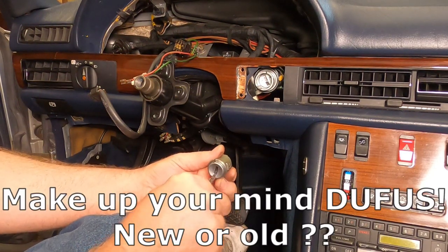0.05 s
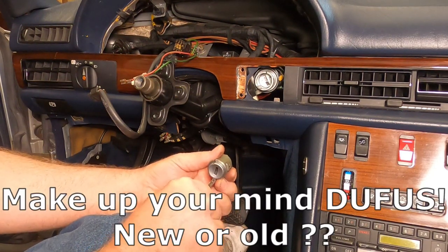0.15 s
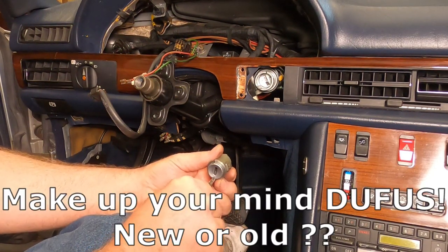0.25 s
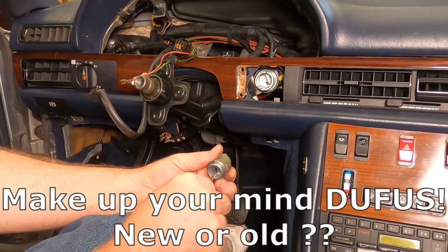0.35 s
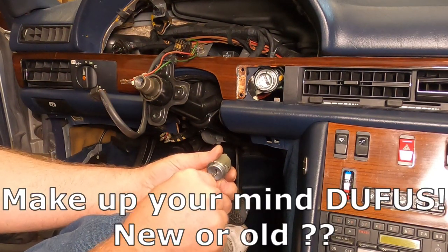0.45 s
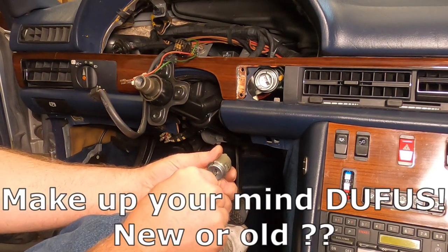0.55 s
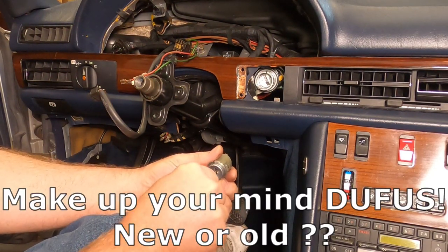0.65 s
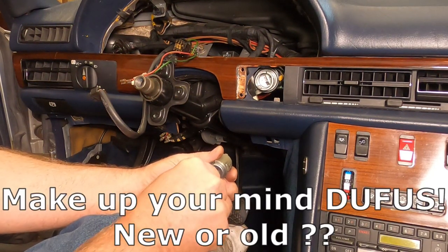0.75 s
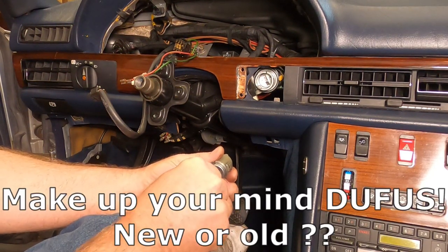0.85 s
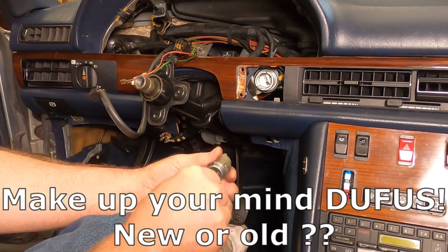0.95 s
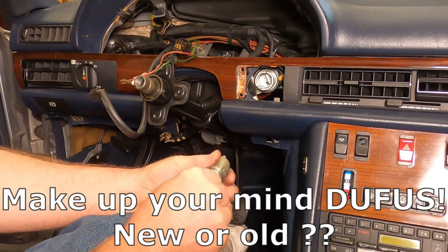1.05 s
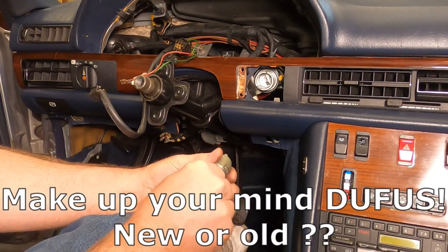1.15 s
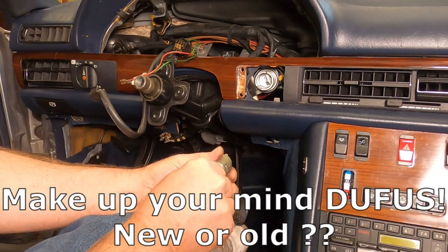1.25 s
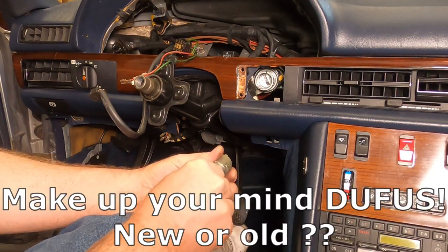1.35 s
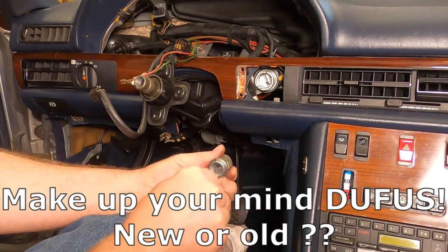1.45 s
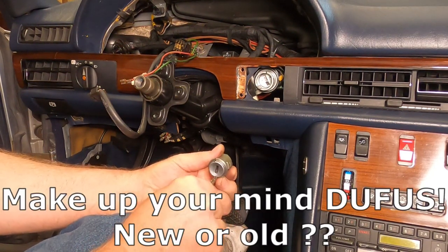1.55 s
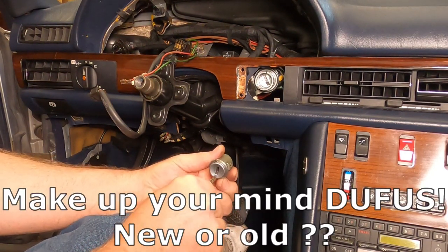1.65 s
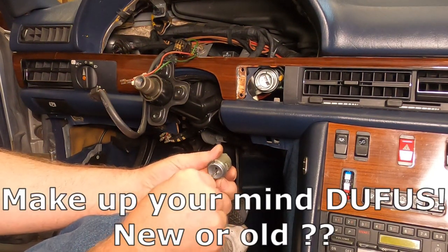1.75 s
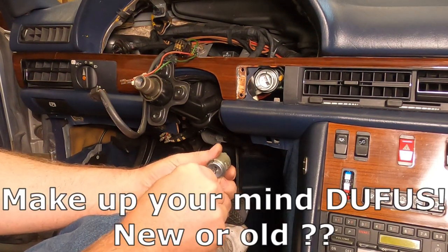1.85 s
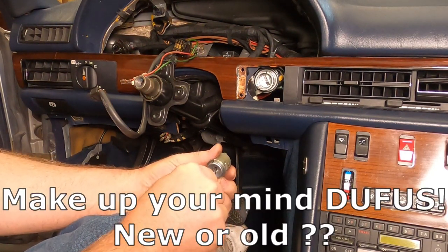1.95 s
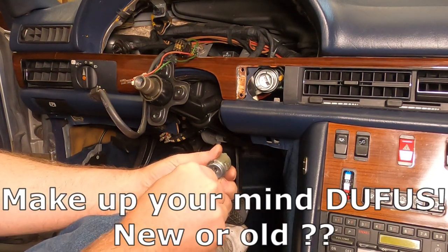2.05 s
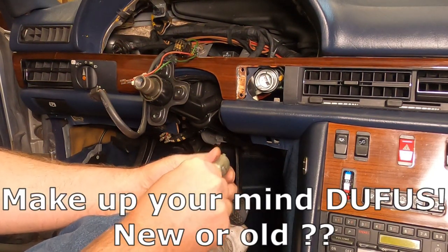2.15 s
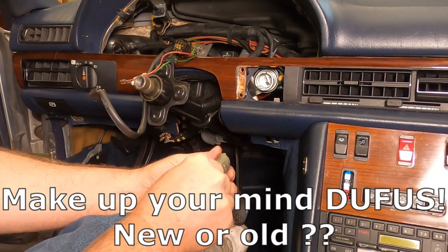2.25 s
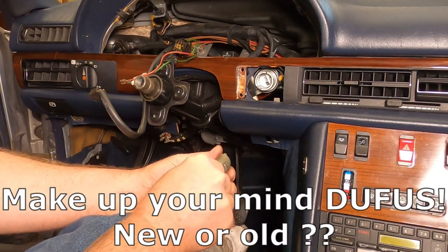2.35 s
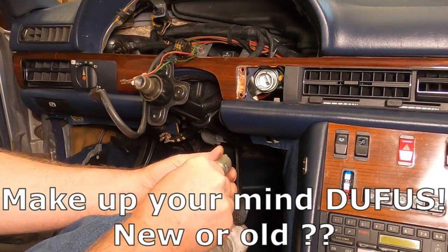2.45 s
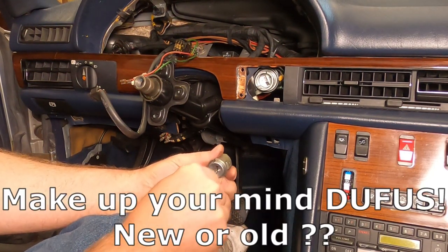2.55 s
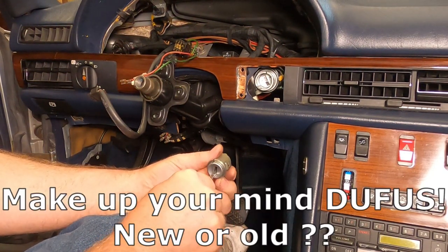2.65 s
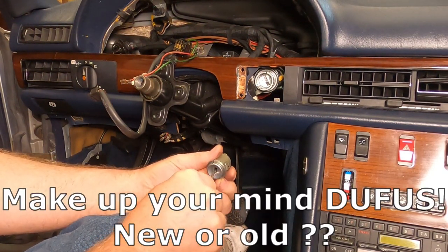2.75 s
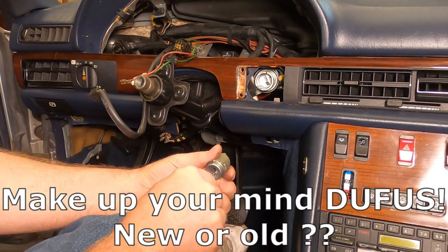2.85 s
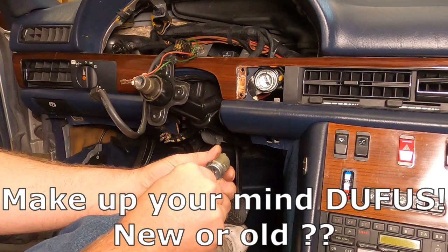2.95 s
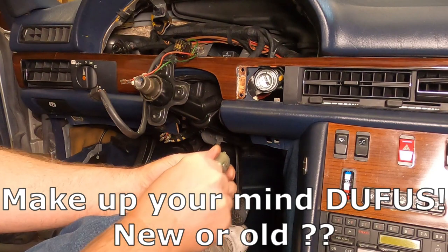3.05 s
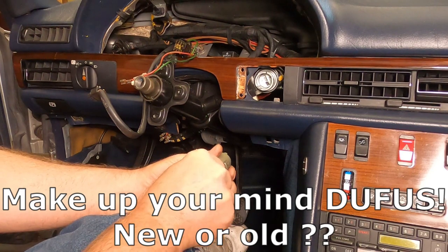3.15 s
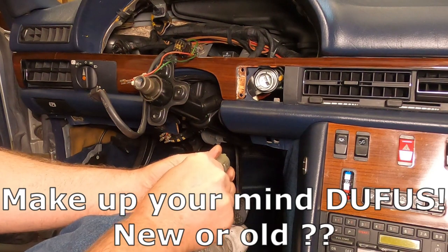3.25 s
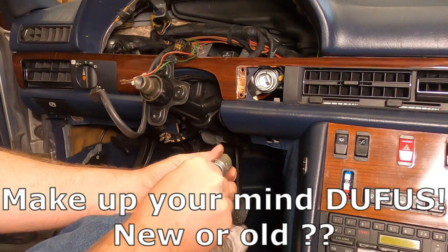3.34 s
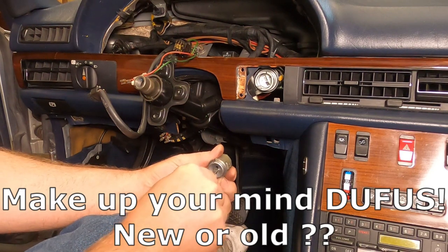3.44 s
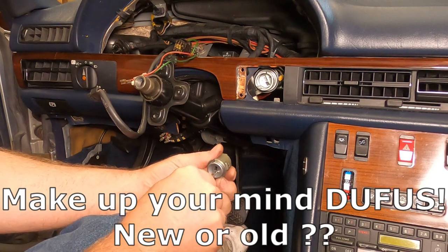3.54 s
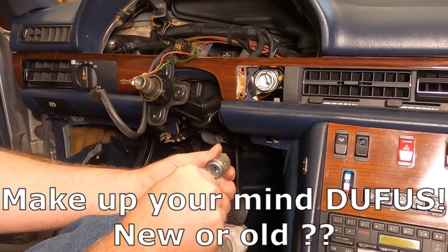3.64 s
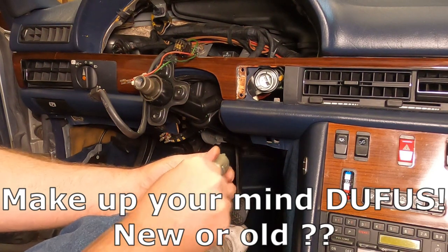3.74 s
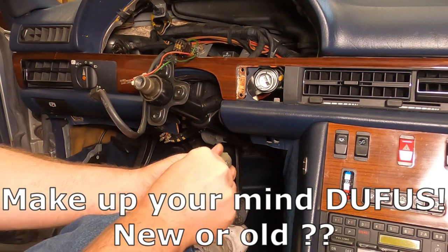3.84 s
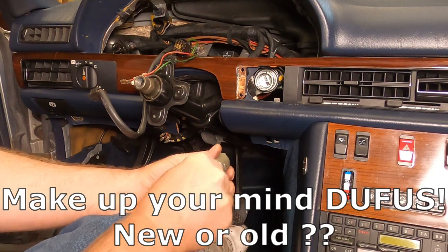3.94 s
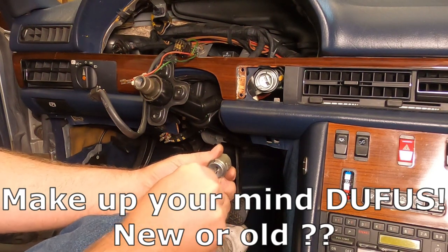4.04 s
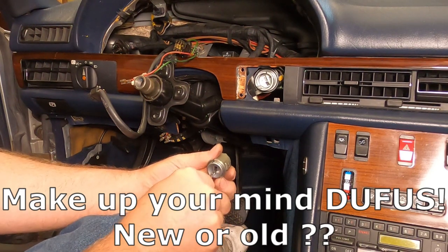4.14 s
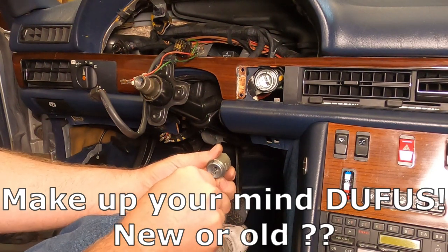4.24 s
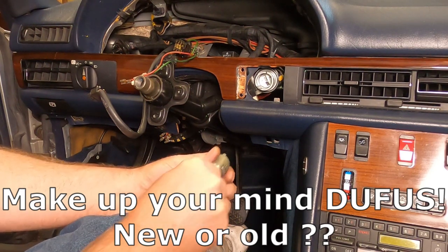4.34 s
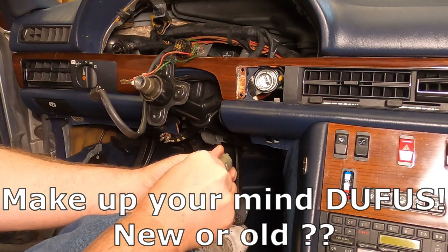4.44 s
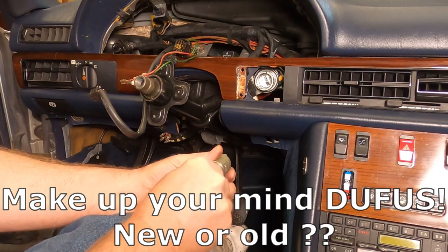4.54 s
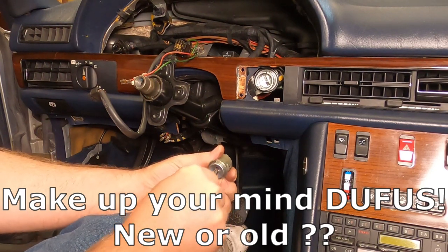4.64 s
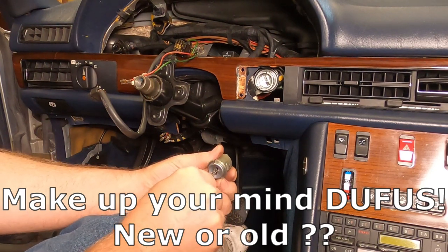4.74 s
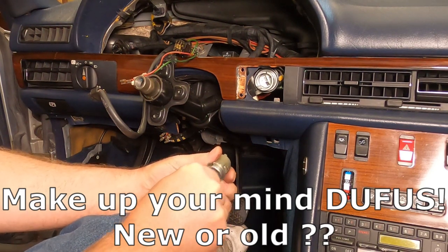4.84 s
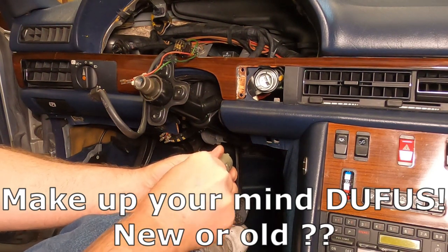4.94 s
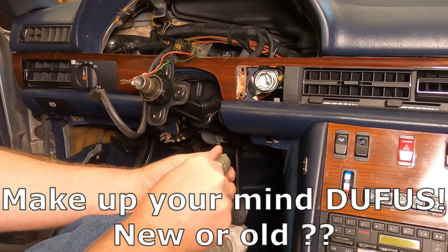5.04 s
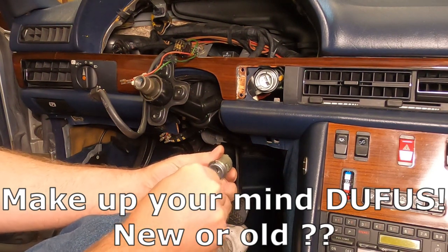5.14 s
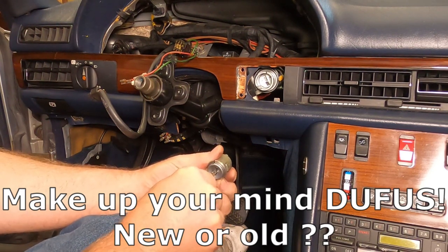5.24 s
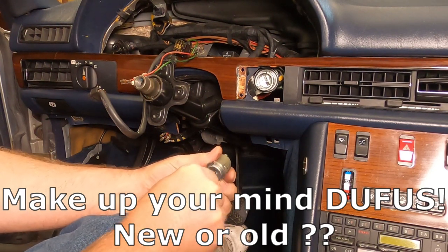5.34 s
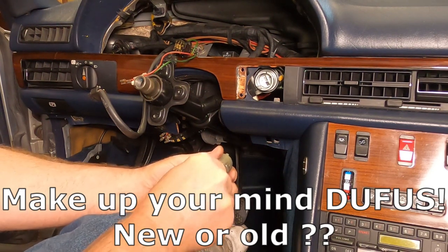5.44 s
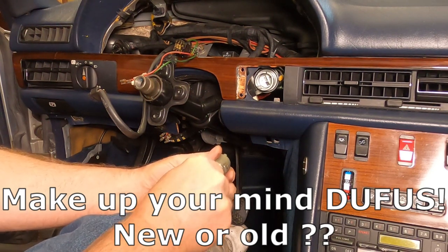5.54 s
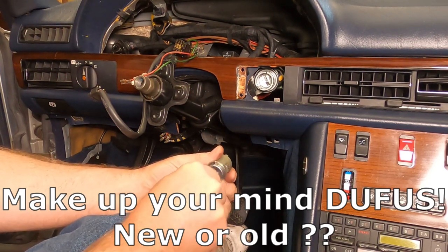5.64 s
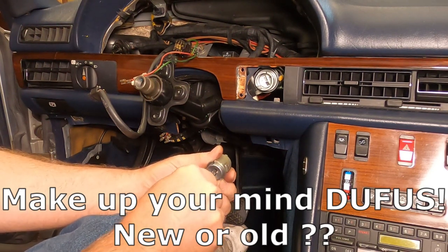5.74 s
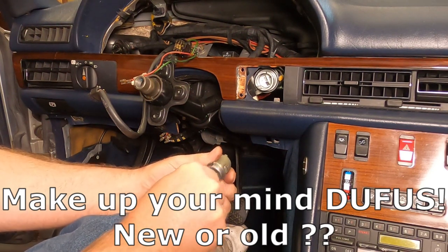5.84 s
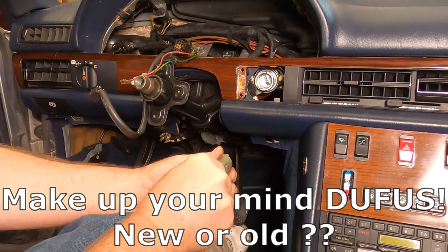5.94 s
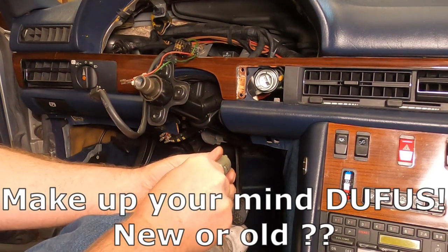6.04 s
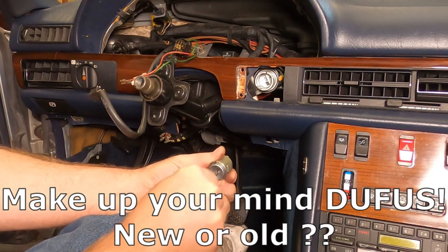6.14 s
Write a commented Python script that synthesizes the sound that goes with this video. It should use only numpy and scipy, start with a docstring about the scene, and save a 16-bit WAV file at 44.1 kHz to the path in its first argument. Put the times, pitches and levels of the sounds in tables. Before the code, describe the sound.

A key slides in and out of a hand-held car ignition lock with short rasps and sharp metal snaps, gradually quickening.

```python
"""A key is worked in and out of a hand-held ignition lock cylinder inside a parked car.
Stick-slip friction over the sprung tumblers makes each push rasp, and the impact on the stop excites
the modes of barrel and blade in a sharp metal snap. Each pull rasps more softly, and light contacts
tick between strokes. Reflections in the cabin add a short tail, over a faint workshop hum."""
import sys
import numpy as np
from scipy import signal
from scipy.fft import rfft, irfft, next_fast_len
from scipy.io import wavfile

SR = 44100
rng = np.random.default_rng(int(sys.argv[2]) if len(sys.argv) > 2 else 0)


def to_wav(s):
    """Save 16-bit WAV."""
    ch = np.atleast_2d(s).T  # columns
    pcm = np.round(np.clip(ch, -1, 1) * 32767)  # PCM
    wavfile.write(sys.argv[1], SR, pcm.astype(np.int16))


N = 272979

# Spectra of the workshop air and a far rumble: f/Hz, relative level/dB
AIR_SPECTRUM = [(25, -8.5), (45, -1.5), (85, -3), (130, -4.5), (250, -6), (400, -9), (700, -14.5),
                (1300, -18), (2500, -20.5), (4000, -18.5), (6000, -20.5), (10000, -25.5), (16000, -30.5)]
RUMBLE_SPECTRUM = [(25, -35.5), (62, -18.5), (78, 3.5), (100, -2.5), (200, -44), (1000, -89)]
# Partials of the workshop hum: f/Hz, level/dB
HUM_PARTIALS = [(97, -87.5), (242, -79.5), (377, -86), (479, -82), (1314, -88)]
# Swells of the rumble: centre t/s, half width/s, level/dB
RUMBLE_SWELLS = [(2.33, .2, -65.5), (2.88, .14, -70.5), (4.699, .14, -75)]
# Spectra of the key touching, pulled, skating and pushed: f/Hz, relative level/dB
TOUCH_SPECTRUM = [(100, -27), (1500, -30), (2600, -23), (3400, -11), (4300, 0), (5400, -7), (7500, -6),
                  (10000, -9), (11500, -6), (16000, -11)]
PULL_SPECTRUM = [(100, -17), (1300, -24.5), (2000, -20), (2300, -14), (3200, -15), (4000, 1.5), (4500, 0),
                 (5400, -10.5), (6800, -1), (9000, -6), (9900, 1.5), (10800, -4.5), (12500, -16),
                 (16000, -20.5)]
SKATE_SPECTRUM = [(2000, -20), (3300, -8), (4100, 0), (5000, -13), (8000, -13), (12000, -34)]
PUSH_SPECTRUM = [(47, -42), (80, -15.5), (186, -12), (563, -21.5), (1630, -22), (3170, -10.5), (4230, 3),
                 (4830, -5.5), (5900, -4.5), (6890, -4), (8790, -7.5), (9820, -3.5), (12300, -16.5),
                 (15000, -19.5), (16000, -25)]
# Treble added to a touch: f/Hz, gain at zero brightness/dB, slope/(dB per dB of brightness)
TOUCH_TREBLE_GAIN = [(4900, -1, 0), (6500, -7, 0.84), (9500, 5, 1), (11200, -12, 1.5)]
# Outward strokes: unseating t/s, first catch t/s, slide duration/s, stroke level/dB, tick level/dB
PULL_STROKES = [(0.0396, 0.065, 0.08, -37, -37.5), (1.509, 1.5462, 0.075, -37, -44.5),
                (2.6165, 2.6528, 0.084, -37, -43.5), (3.4603, 3.488, 0.083, -35.5, -44),
                (4.121, 4.146, 0.062, -36, -47), (4.7073, 4.7417, 0.062, -36, -46.5),
                (5.2356, 5.2652, 0.08, -36.5, -46), (5.744, 5.7749, 0.085, -36, -46)]
# Tumblers dropping behind a pulled key: t after the catch/s, level relative to the stroke/dB
TUMBLER_DROPS = [(0, 3), (.0185, 2), (.029, 2.5), (0.05, 1.5), (.063, -0.5)]
# Light touches between strokes: t/s, relative level/dB, brightness/dB
KEY_TAPS = [(0.454, -29, -10.5), (.5208, -58.5, 1.5), (.5523, -55, -14), (0.6172, -44, -11.5),
            (.7152, -58.5, -2.5), (.7272, -55, -10), (.7936, -53.5, -9), (0.951, -52, 3),
            (1.1167, -36, -1.5), (1.124, -40, -3), (1.1283, -34, -1.5), (1.4993, -43.5, -4),
            (1.633, -49, 2), (1.9278, -33.5, -6), (1.9813, -45, -9.5), (2.1829, -63, 8.5),
            (2.2154, -56, -15), (2.2499, -42, -15), (2.2554, -45.5, -1), (2.8164, -40.5, -2),
            (3.026, -46, -12), (3.1406, -40, -4.5), (3.1574, -34.5, -6.5), (3.8157, -37, -3),
            (3.8657, -36.5, -6), (4.4159, -51.5, -3.5), (4.8279, -41, -0.5), (5.3495, -45, -5),
            (5.4944, -44, -13), (5.866, -43.5, 2), (5.979, -43, -9), (5.9866, -37.5, 3), (6.0004, -34.5, 0)]
# Inward strokes: entry t/s, stop t/s, stroke level/dB, snap gain/dB, blow's peak f/Hz,
# blow's treble gain/dB, thud level within the snap/dB
PUSH_STROKES = [(1.218, 1.2533, -31.5, -4.5, 4660, 0, -31), (2.2939, 2.3381, -29, -0.5, 4480, 8.5, -30),
                (3.19, 3.2268, -27, 0.5, 4480, 5, -27), (3.888, 3.933, -26, 1, 4420, 4.5, -24),
                (4.4815, 4.5301, -26.5, .5, 4510, 2.5, -30), (5.0086, 5.0623, -26, -1, 4480, 1, -30),
                (5.511, 5.5715, -27.5, -0.5, 4480, -1.5, -31), (6.0138, 6.0668, -29, -3, 4420, -1, -28.5)]
# Tumblers lifted by a pushed key: t before the stop/s, level relative to the stroke/dB
TUMBLER_LIFTS = [(.0455, -5), (.032, -5.5), (.0195, 1), (.0093, 3)]
# Spectra of the blow on the stop, its thud into the hand and the rattle: f/Hz, relative level/dB
BLOW_SPECTRUM = [(900, -40), (1800, -29), (2350, -22), (3300, -21), (3950, -4), (4480, 0), (5200, -12),
                 (6400, -13), (7200, -15), (8050, -11), (8700, -18), (9600, -14), (11200, -25),
                 (16000, -36)]
THUD_SPECTRUM = [(60, -32), (160, 1.5), (400, 4), (1000, 4), (1600, 5.5), (3000, -28.5)]
RATTLE_SPECTRUM = [(1000, -28.5), (1900, -19.5), (2350, -6.5), (2800, -6.5), (3300, -12), (4000, -6.5),
                   (4700, -2), (5700, -12), (8000, -11), (8900, -20), (9800, -15), (11200, -25.5),
                   (16000, -34.5)]
# Modes of the lock barrel, and of the key blade and springs: f/Hz, relative level/dB, t60/s
BARREL_MODES = [(2480, -19, .008), (2800, -19, .006), (3980, -12, .006), (4550, -1, .008), (4900, 0, .007),
                (5320, -13, .007), (6400, -21, .006), (9760, -17, .005)]
BLADE_MODES = [(2440, -31, 0.054), (3300, -32, .045), (4530, -37, .08), (4820, -38.5, .18),
               (8000, -33, 0.068)]
# Shifts of the hand's grip: t/s, duration/s, level/dB, centre f/Hz
GRIP_SHIFTS = [(1.433, 0.051, -61.5, 580), (2.391, 0.052, -58, 443)]
# Spectra of the cabin's early reflections, its tail and the tail's treble: f/Hz, relative level/dB
EARLY_SPECTRUM = [(100, 2.5), (1200, 4.0), (2500, 1), (4500, -3.5), (7000, 0.0), (16000, -3.0)]
TAIL_SPECTRUM = [(100, 6), (1200, 3.5), (2700, 5), (3700, -1.5), (4600, -5), (5600, -3.5),
                 (7000, -4.5), (10000, -17.5)]
TAIL_TREBLE_SPECTRUM = [(3000, -28.5), (7000, -10), (16000, 13)]


def amp(db):
    """Amplitude ratio for a level in decibels."""
    return 10 ** (np.asarray(db) / 20)


def gains(spectrum, size):
    """Magnitude response on FFT bins, interpolated in decibels over log frequency."""
    hz, db = np.transpose(sorted(spectrum))
    bin_hz = np.fft.rfftfreq(size, 1 / SR)
    return amp(np.interp(np.log(bin_hz + 1), np.log(hz), db))


def knock(spectrum, size=1024):
    """Minimum-phase impulse response of a body: folding the cepstrum makes it causal."""
    cepstrum = irfft(np.log(gains(spectrum, size)))
    cepstrum[1:size // 2] *= 2
    cepstrum[size // 2 + 1:] = 0
    return irfft(np.exp(rfft(cepstrum)))


def noise(spectrum, size):
    """White noise filtered to a spectrum, at unit rms."""
    padded = next_fast_len(size, real=True)
    white = rfft(rng.standard_normal(padded))
    x = irfft(white * gains(spectrum, padded), padded)[:size]
    return x / x.std()


def peak(x):
    """Maximum of the analytic envelope."""
    return np.abs(signal.hilbert(x)).max()


def attack_rms(x, attack_s=.004):
    """Rms amplitude at the onset of a transient."""
    return x[:int(attack_s * SR)].std()


def fade(t, t60):
    """Exponential damping, 60 dB in t60 seconds."""
    return np.exp(-np.log(1000) * t / t60)


def add(out, s, x):
    """Superpose x on out from time s."""
    i = max(int(s * SR), 0)
    out[i:i + len(x)] += x[:max(len(out) - i, 0)]


def workshop(air_db=-67.5, side_db=-14, swell_db=1.0, rumble_floor_db=-82):
    """Slow modulation varies the level of the air and of a far rumble, and the phase of a thin hum."""
    t = np.arange(N) / SR

    def drift(count):
        """Linear interpolation between random values."""
        return np.interp(t, np.linspace(0, t[-1], count), rng.standard_normal(count))
    air_gain = amp(air_db + swell_db * drift(24))
    air = noise(AIR_SPECTRUM, N) + amp(side_db) * noise(AIR_SPECTRUM, N) * np.array([[1], [-1]])
    hum = sum(amp(db) * np.sqrt(2) * np.sin(2 * np.pi * hz * t + drift(30)) for hz, db in HUM_PARTIALS)
    swells = sum(amp(db) * np.exp(-((t - s) / width) ** 2) for s, width, db in RUMBLE_SWELLS)
    rumble = (amp(rumble_floor_db) + swells) * noise(RUMBLE_SPECTRUM, N)
    return air_gain * air + hum + rumble


def click(body, buzz_db, buzz_t60):
    """Convolution: one impact and a brief buzz of finer ones drive the body's impulse response."""
    t = np.arange(len(body)) / SR
    force = amp(buzz_db) * rng.standard_normal(len(t)) * fade(t, buzz_t60)
    force[0] = 1
    return signal.fftconvolve(force, body)[:len(t)]


def touch(db, bright_db, pitch_ratio=.95, detune=.04):
    """Impact excitation of the key: the harder the point of contact, the more treble."""
    pitch = pitch_ratio * (1 + detune * rng.standard_normal())  # the fingers alter each ring
    hz, plain_db, slope = np.transpose(TOUCH_TREBLE_GAIN)
    treble_db = plain_db + slope * bright_db
    spectrum = [(f * pitch, level + np.interp(f, hz, treble_db)) for f, level in TOUCH_SPECTRUM]
    x = click(knock(spectrum), buzz_db=-13, buzz_t60=.021)
    ring_band = signal.butter(3, [3000, 5500], "band", fs=SR, output="sos")
    return amp(db) * x / attack_rms(signal.sosfilt(ring_band, x))


def tumbler(spectrum, db, scatter_db=1.36):
    """A spring's restoring force drives a tumbler into a notch of the key with a click."""
    x = click(knock(spectrum), buzz_db=-11, buzz_t60=.028)
    return amp(db + scatter_db * rng.standard_normal()) * x / attack_rms(x)


def rasp(length, spectrum, first_db, last_db, slip_hz=220, uneven=.35, scatter_db=3.0, grit_db=-10):
    """Stick-slip friction of metal on metal: an irregular train of clicks over fine grit."""
    size, body = int(length * SR), knock(spectrum)
    x = np.zeros(size + len(body))
    slip_times = np.cumsum(np.exp(uneven * rng.standard_normal(40)) / slip_hz)
    for s in slip_times - slip_times[0]:
        slip = amp(scatter_db * rng.standard_normal()) * click(body, buzz_db=-13.5, buzz_t60=.025)
        if s < length:
            add(x, s, slip)
    x /= x[:size].std()
    add(x, 0, amp(grit_db) * noise(spectrum, size))
    return x * amp(np.interp(np.arange(len(x)), [0, size], [first_db, last_db]))


def pulls(rasp_db=-2, fall_db=2.5, brush_db=-18, catch_s=.011, jitter_s=.0006):
    """Sliding friction eases on the way out: the key unseats, brushes the keyway, catches and rasps."""
    out = np.zeros(N)
    for unseat, start, length, db, tick_db in PULL_STROKES:
        slide = start + catch_s
        add(out, unseat, touch(tick_db, bright_db=1.5))
        add(out, unseat, amp(db + brush_db) * noise(PULL_SPECTRUM, int((slide - unseat) * SR)))
        add(out, slide, rasp(length - catch_s, PULL_SPECTRUM, db + rasp_db, db + rasp_db - fall_db))
        for after_s, click_db in TUMBLER_DROPS:
            s = after_s + jitter_s * rng.standard_normal()
            drop = tumbler(PULL_SPECTRUM, db + click_db)
            if s < length:
                add(out, start + s, drop)
    return out


def ticks(gain_db=-1, skate_at_s=.47, skate_length_s=.1, skate_db=-65):
    """Light impacts and friction: the key's tip taps the lock face and once skates across it."""
    out = np.zeros(N)
    for s, db, bright_db in KEY_TAPS:
        add(out, s, touch(db + gain_db, bright_db))
    add(out, skate_at_s, rasp(skate_length_s, SKATE_SPECTRUM, skate_db, skate_db))
    return out


def pushes(entry_db=-9.5, rasp_db=-2, rise_db=6.5, free_s=.0036, jitter_s=.0006):
    """Sliding friction grows as the key clicks in past the tumblers; it runs free just before the stop."""
    out = np.zeros(N)
    for start, stop, db, *_ in PUSH_STROKES:
        length = stop - start - free_s
        add(out, start, tumbler(PUSH_SPECTRUM, db + entry_db))
        add(out, start, rasp(length, PUSH_SPECTRUM, db + rasp_db - rise_db, db + rasp_db))
        for before_s, click_db in TUMBLER_LIFTS:
            s = stop - before_s + jitter_s * rng.standard_normal()
            lift = tumbler(PUSH_SPECTRUM, db + click_db)
            if s > start:
                add(out, s, lift)
    return out


def snaps(contact_s=.00047, chatter_s=.00044, chatter_db=-3, rebound_s=.0018, rebound_db=-1,
          rattle_db=-23, rattle_t60=.051, wash_db=-45, wash_t60=.36):
    """Impact and rebound: the key hits its stop, chatters and lands again, ringing barrel and blade."""
    out, t = np.zeros(N), np.arange(16384) / SR
    thud = knock(THUD_SPECTRUM)
    for _, stop, _, db, blow_hz, treble_db, thud_db in PUSH_STROKES:
        pitch = blow_hz / 4480  # moves the spectrum's peak to blow_hz
        blow = knock([(f * pitch, level + treble_db * (f > 6000)) for f, level in BLOW_SPECTRUM])
        blow /= peak(blow)
        hit = np.zeros(len(t))
        add(hit, 0, blow)
        add(hit, chatter_s * (1 + .03 * rng.standard_normal()), amp(chatter_db) * blow)
        add(hit, 0, amp(thud_db) * thud / peak(thud))
        ring = amp(rebound_db) * barrel_ring(t)
        add(hit, rebound_s * (1 + .049 * rng.standard_normal()), ring)
        for hz, mode_db, t60 in BLADE_MODES:
            hz *= 1 + .006 * rng.standard_normal()
            hit += amp(mode_db) * fade(t, t60) * np.sin(2 * np.pi * hz * t)
        # the tumblers' rattle dies fast, and a faint, diffuse wash lingers on after it
        envelope = amp(rattle_db) * fade(t, rattle_t60) + amp(wash_db) * fade(t, wash_t60)
        hit += envelope * noise(RATTLE_SPECTRUM, len(t))
        add(out, stop + contact_s, amp(db) * hit)
    return out


def barrel_ring(t, scatter_db=1.2, detune=.012, build_s=.00089):
    """Damped modes of the barrel, whose levels and frequencies the grip alters at every blow."""
    ring = np.zeros(len(t))
    for hz, db, t60 in BARREL_MODES:
        gain = amp(db + scatter_db * rng.standard_normal())
        hz *= 1 + detune * rng.standard_normal()
        ring += gain * fade(t, t60) * np.sin(2 * np.pi * hz * t)
    ring *= 1 - np.exp(-t / build_s)  # builds up as the parts press together
    return ring / peak(ring)


def grips():
    """Friction of skin on the lock body gives soft bands of noise as the hand shifts."""
    out = np.zeros(N)
    for s, length, db, hz in GRIP_SHIFTS:
        size = int(length * SR)
        brush = noise([(hz / 4, -10), (hz, 0), (hz * 2, -12), (hz * 8, -35)], size)
        add(out, s, amp(db) * np.hanning(size) * brush)
    return out


def cabin(x, early_db=-15, early_t60=.1, late_db=-31, late_t60=.45, treble_t60=.28,
          side_db=-13, delay_s=.0032):
    """Reverberation: dense reflections off dashboard and glass, then a tail that loses treble first."""
    t = np.arange(SR // 2) / SR
    mid, side = np.zeros((2, N))
    for wet in (mid, side):
        early = noise(EARLY_SPECTRUM, len(t)) * fade(t, early_t60)
        late = noise(TAIL_SPECTRUM, len(t)) * fade(t, late_t60)
        late += noise(TAIL_TREBLE_SPECTRUM, len(t)) * fade(t, treble_t60)
        early *= amp(early_db) / np.linalg.norm(early)
        late *= amp(late_db) / np.linalg.norm(late)
        add(wet, delay_s, signal.fftconvolve(x, early + late))
    return x + mid + amp(side_db) * side * np.array([[1], [-1]])


def scene():
    """Superposition of the lock, reverberating in the cabin, and the workshop background."""
    return cabin(pushes() + snaps() + pulls() + ticks() + grips()) + workshop()


def record(dry, ceiling=.87, cutoff_hz=15800):
    """Soft saturation rounds the loudest peaks, and a low-pass filter removes the highest treble."""
    rounded = dry / (1 + (dry / ceiling) ** 8) ** (1 / 8)
    lowpass = signal.ellip(12, .1, 95, cutoff_hz, fs=SR, output="sos")
    return signal.sosfilt(lowpass, rounded)


dry = scene()
out = record(dry)
to_wav(out)
```